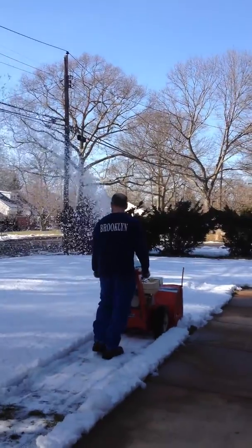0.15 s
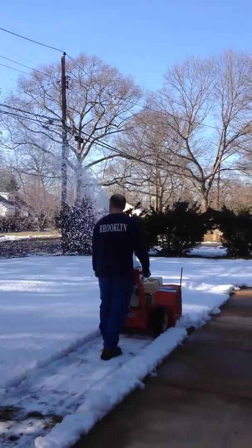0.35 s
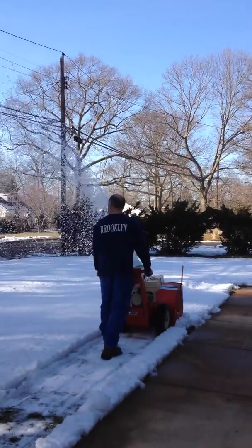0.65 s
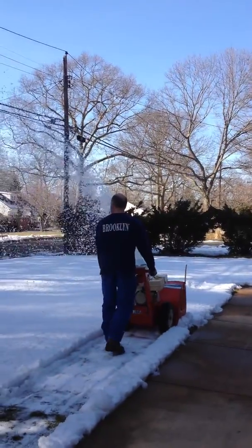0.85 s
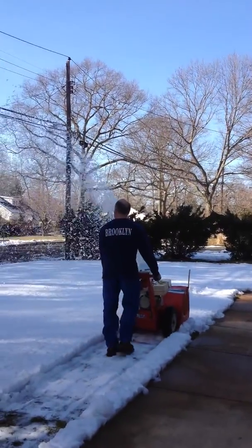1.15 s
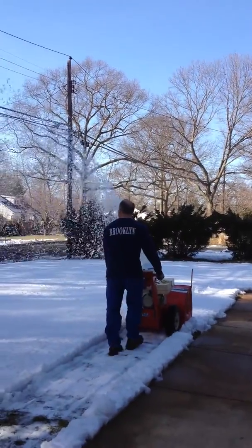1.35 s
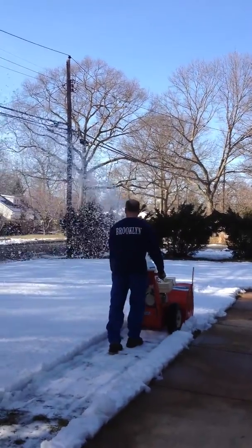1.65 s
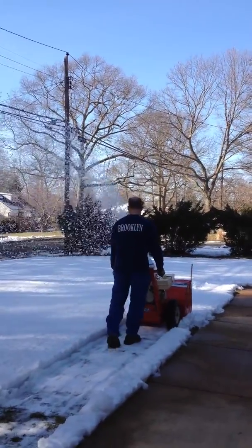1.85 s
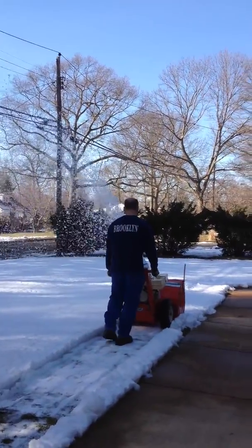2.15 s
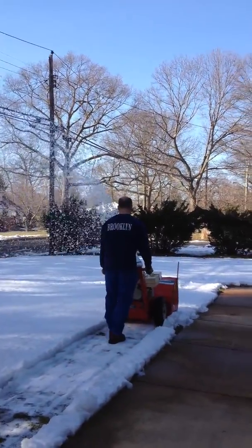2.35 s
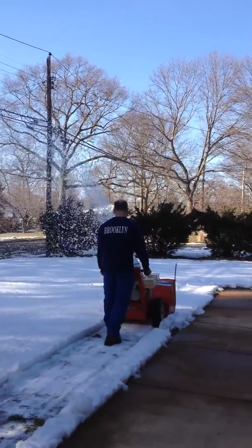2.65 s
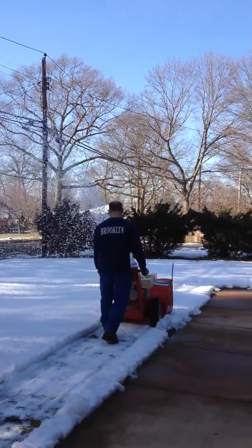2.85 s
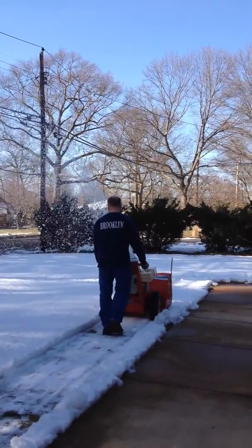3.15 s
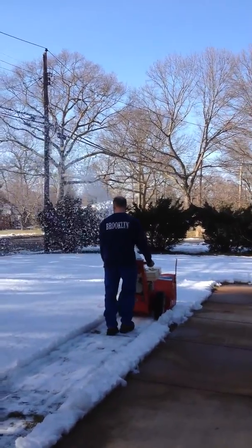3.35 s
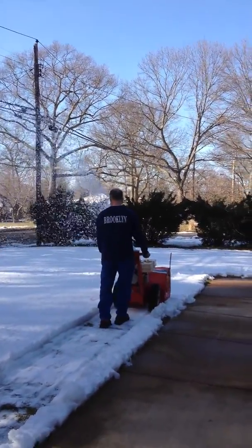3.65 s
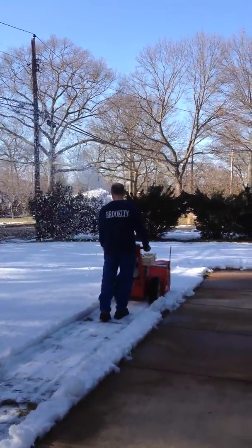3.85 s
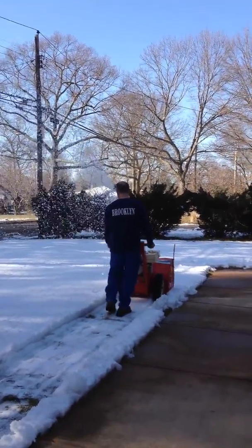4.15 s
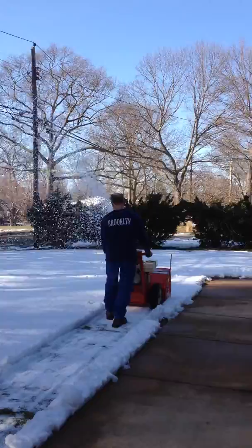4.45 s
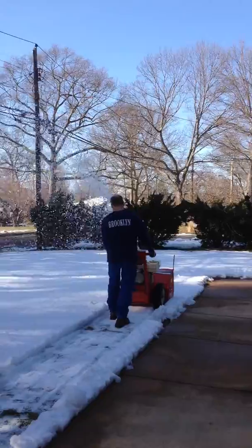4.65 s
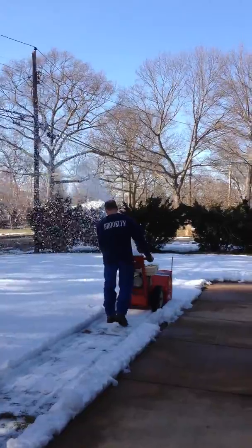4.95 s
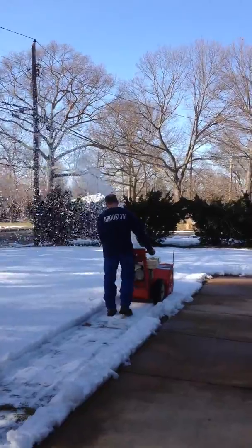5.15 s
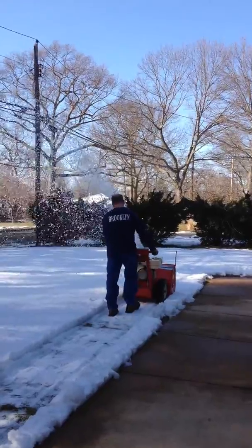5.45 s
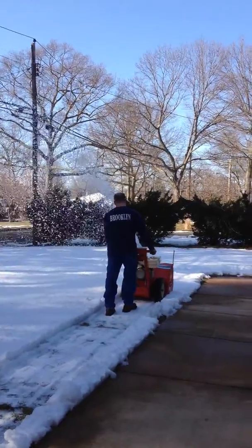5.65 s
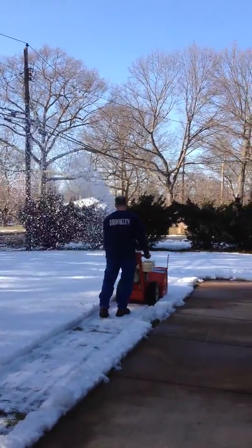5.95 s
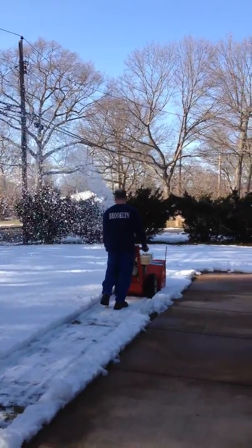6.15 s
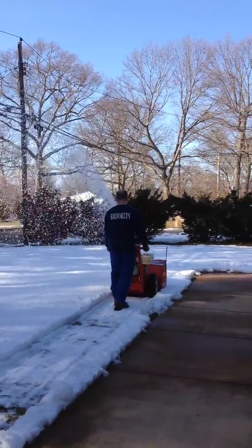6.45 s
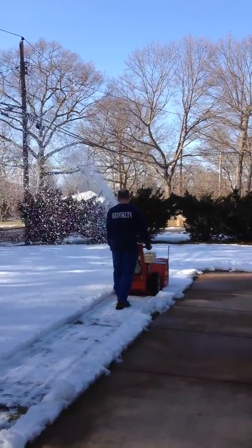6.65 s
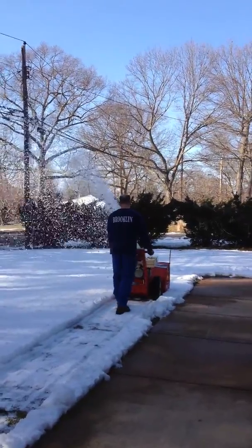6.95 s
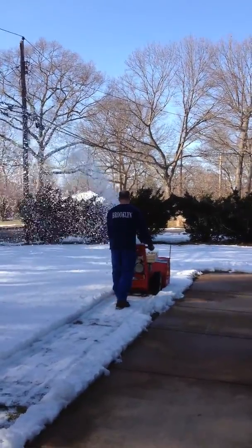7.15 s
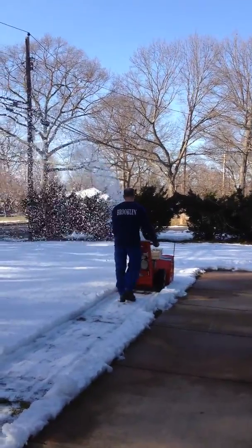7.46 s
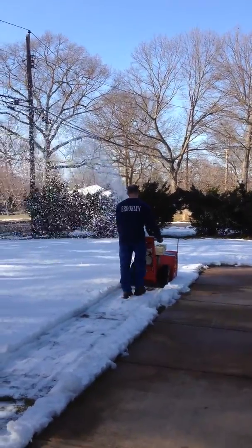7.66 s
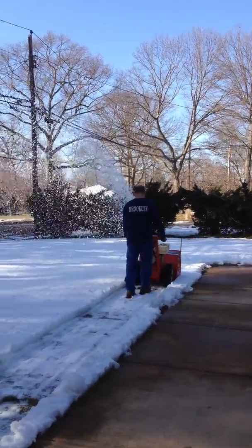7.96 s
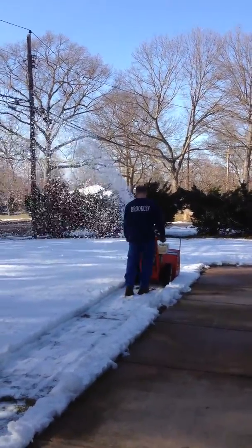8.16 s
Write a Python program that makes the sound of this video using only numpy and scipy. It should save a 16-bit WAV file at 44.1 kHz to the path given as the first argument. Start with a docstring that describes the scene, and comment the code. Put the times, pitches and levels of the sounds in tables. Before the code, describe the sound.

A continuous petrol snowblower, heard from behind in the open air. Rapid exhaust pops blur into a low buzzing hum, valve clatter ticks sharply on top, and the impeller rumbles unevenly. Hissing, tinny snow-and-air noise dominates. Engine speed wavers slightly under load. Over eight seconds the ticks dull and the roar sinks, while the low rumble stays nearly constant.

```python
"""A single-cylinder four-stroke snowblower crosses a snowy lawn, from about 6 m off a small microphone to 12 m.
Throughout, the impeller rumbles and fan air and flying snow roar in the sheet-metal housing: filtered noise.
Over this, every cycle, valve gear knocks as short rings, the intake gulps and the exhaust pops as filtered clicks.
As the machine walks off, rumble, roar and pulses sink by their own shares of the distance law;
the knocks fade by stages, the sharpest tick most."""
import sys
import numpy as np
from scipy import signal
from scipy.fft import rfft, irfft
from scipy.io import wavfile
from scipy.ndimage import uniform_filter1d

SR = 44100
rng = np.random.default_rng(int(sys.argv[2]) if len(sys.argv) > 2 else 0)


def store_pcm(level_fs):
    """Save levels as 16-bit WAV."""
    pcm = np.round(np.clip(level_fs, -1, 1) * 32767).astype(np.int16)
    wavfile.write(sys.argv[1], SR, np.atleast_2d(pcm).T)


N = 366912

START_M, PACE_M_PER_S = 5.83, 0.76  # distance from the microphone at the start, walking pace
# levels at the start, before swells and engine speed act on them
PULSE_DB, RUMBLE_DB, ROAR_DB = -29.5, -34, -25.5
# share of the 1 / distance law that pulses, rumble and roar follow
PULSE_FALL, RUMBLE_FALL, ROAR_FALL = 0.37, 0.06, 0.92


def gain_of(db):
    """Decibels to amplitude."""
    return 10 ** (np.asarray(db) / 20)


def evened(x):
    """Scales to rms 1."""
    return x / np.sqrt(np.mean(x ** 2) + 1e-20)


def read(points, hz):
    """Reads a spectrum table on a log-frequency axis."""
    f, value = np.transpose(points)
    return np.interp(np.log(hz + 1), np.log(f + 1), value)


def coloured(x, points):
    """Passes x through a fixed spectrum."""
    gain = gain_of(read(points, np.fft.rfftfreq(N, 1 / SR)))
    return irfft(rfft(x) * gain, N)


def way_gone():
    """Share of the walk done at every sample, 0-1."""
    return np.arange(N) / N


def staged(values, away):
    """Joins a near, a midway and a far value along the walk."""
    return np.interp(away, (.1, .6, .9), values)


def heard_db(start_db, fall):
    """Level of pulses, rumble or roar as the machine walks off, by a share of the distance law."""
    distance_ratio = 1 + PACE_M_PER_S * np.arange(N) / SR / START_M
    return start_db - fall * 20 * np.log10(distance_ratio)


def speed():
    """Engine cycles per second at every sample."""
    # engine speed hunting under load: (t/s, f/Hz in engine cycles)
    hunting = [(0.0, 25.68), (0.32, 24.66), (1.15, 25.13), (1.33, 25.66), (2.16, 24.79), (2.76, 25.89),
               (3.32, 24.88), (3.78, 25.55), (4.0, 25.14), (4.22, 25.69), (4.95, 24.65), (5.53, 25.56),
               (5.81, 25.14), (6.54, 25.02), (7.24, 25.47), (7.52, 24.92), (8.08, 25.11), (8.32, 24.82)]
    s, hz = np.transpose(hunting)
    return np.interp(np.arange(N) / SR, s, hz)


def cycles():
    """Engine cycles done at every sample, starting part-way through one."""
    return -.129 + np.cumsum(speed()) / SR


def strokes(place, spread_db, jitter_ms):
    """One click a cycle at the given place, uneven in size and time."""
    done = cycles()
    turn = np.arange(-1, int(done[-1]) + 1)
    lateness, size = rng.standard_normal((len(turn), 2)).T
    # turns before the start or past the end land at -N and are dropped
    at = np.interp(turn + place, done, np.arange(N), left=-N, right=-N)
    at = at + lateness * jitter_ms * SR / 1000
    inside = (at >= 0) & (at < N - 1)
    clicks = np.zeros(N)
    clicks[at[inside].astype(int)] = gain_of(spread_db * size[inside])
    return clicks


def rumble():
    """Snow churning in the impeller: low, lumpy noise, louder as the engine speeds up."""
    # impeller colour: (f/Hz, relative level/dB per Hz)
    churn = [(30, -47), (75, -28), (100, -16), (140, -12), (180, 2), (215, -1), (260, -5.5), (310, -3),
             (370, -6), (430, -14), (480, -21.5), (800, -62)]
    usual_hz, db_per_hz = 25.3, 3
    lumps = evened(uniform_filter1d(rng.standard_normal(N), size=3000))
    db = heard_db(RUMBLE_DB, RUMBLE_FALL)
    db += db_per_hz * (speed() - usual_hz)
    db += 1.2 * lumps
    return gain_of(db) * evened(coloured(rng.standard_normal(N), churn))


def throb(band):
    """Power of one band over the cycle: a steady bed plus bursts of clatter and jet hiss."""
    # bursts: (place in the cycle 0-1, rise/ms, decay/ms, peak level over the bed/dB in the four
    # bands around f/Hz 900, 2500, 5500 and 11000, level change by the end of the walk/dB)
    bursts = [(.39, .6, 2.4, -3, 0, -1, 3, -2.5), (.69, .5, 1, 3, -8, -8, -12, -1),
              (.77, .8, 2.2, -3, .5, -1, 1.5, .5), (.02, .8, 1.8, -1, -8, -9, -9, 0)]
    ms = np.arange(1200) / SR * 1000
    power = np.ones(N)
    for place, rise_ms, decay_ms, *dbs, fade_db in bursts:
        shape = (1 - np.exp(-ms / rise_ms)) * np.exp(-ms / decay_ms)
        # triggered a little ahead of the listed place
        hits = strokes(place - .02, spread_db=3, jitter_ms=.25)
        burst_power = gain_of(2 * (dbs[band] + fade_db * way_gone()))  # doubled dB: power
        power += burst_power * signal.oaconvolve(hits, shape / shape.max())[:N]
    return power / uniform_filter1d(power, size=SR // 2)


def roar():
    """Air and snow noise throbbing with the engine, ringing in the panels, changing colour with distance."""
    # edges between the four throbbing bands: (f/Hz)
    band_edges = (1500, 4000, 7800)
    # roar as the microphone colours it, close by: (f/Hz, relative level/dB per Hz)
    near_colour = [(300, -26), (480, -4), (800, 2.5), (1300, -6.5), (1700, -1.5), (2950, -0.5), (3700, 0),
                   (5500, 8.5), (6600, 3), (9000, -7), (10150, -16.5), (10700, -9.5), (12200, -13.5),
                   (15300, -15)]
    # the same farther off: (f/Hz, relative level/dB per Hz)
    far_colour = [(300, -19), (480, -1.5), (800, 1.5), (1300, 2), (1700, -3), (2950, -1.5), (3700, 2.5),
                  (5500, 7.5), (6600, 4.5), (9000, -6), (10150, -15.5), (10700, -12), (12200, -11.5),
                  (15300, -17)]
    # housing panels ringing, turning with the machine: (f/Hz, width/Hz, boost/dB near, midway, far)
    panels = [(660, 40, 3.3, 2.9, 4.1), (830, 40, 3.3, 3.6, 3.4), (910, 40, 3.7, 4.7, 5.3),
              (1020, 60, 5.6, 0.0, 0.0), (1190, 60, 1.1, 5.4, 0.0), (1375, 60, 3.8, 10.4, 8.6),
              (1560, 50, 1.7, 0.0, 3.7), (1990, 120, 2.4, 5.2, 3.3), (2150, 80, 1.7, 4.9, 1.3),
              (2550, 90, 2.5, 0.0, 3.8), (2700, 60, 4.9, 0.0, 3.4), (3150, 70, 1.4, 2.0, 2.3),
              (3380, 120, 3.3, 2.5, 0.8), (3980, 120, 0.8, 1.8, 0.0), (4280, 200, 3.1, 4.1, 0.6),
              (5000, 120, 3.3, 1.6, 4.0), (5220, 200, 1.7, 5.9, 0.0), (5570, 120, 1.1, 0.0, 2.4),
              (5760, 200, 2.4, 0.0, 6.9), (5930, 200, 2.7, 4.3, 1.7), (9400, 250, 1.7, 1.1, 1.1),
              (11300, 700, 1.5, 4.0, 2.0), (12700, 400, 4.0, 3.7, 2.8), (13650, 200, 6.9, 2.8, 2.4)]
    # swelling and sinking with the depth of snow: (t/s, level/dB)
    snow_depth = [(0, 0.45), (.9, 0.4), (2, -.6), (2.8, .3), (4.3, -.5), (5.4, 1), (6.2, -.3), (7.3, 0.5),
                  (8.32, -0.5)]

    band_of = np.searchsorted(band_edges, np.fft.rfftfreq(N, 1 / SR))
    air = rng.standard_normal(N)
    # clots of snow make all bands flutter together
    clots = evened(uniform_filter1d(rng.standard_normal(N), size=1200))
    air *= gain_of(0.61 * clots)
    air = irfft(sum(rfft(air * np.sqrt(throb(k))) * (band_of == k) for k in range(4)), N)

    hz, t, frames = signal.stft(air, SR, nperseg=2048, noverlap=1536)
    hz, away = hz[:, None], t * SR / N
    db = read(near_colour, hz) * (1 - away) + read(far_colour, hz) * away
    for f, width, *boosts in panels:
        db += staged(boosts, away) / (1 + (2 * (hz - f) / width) ** 2)
    # narrow patches drift as the machine sways behind the person pushing it
    patches = rng.standard_normal((len(t), len(hz))).T
    patches = uniform_filter1d(patches, size=5, axis=0)  # over frequency
    patches = uniform_filter1d(patches, size=40, axis=1)  # over time
    db += 1.4 * evened(patches)
    colour = gain_of(db)
    colour = colour / np.sqrt((colour ** 2).mean(axis=0))  # same mean power at every moment
    noise = signal.istft(frames * colour, SR, nperseg=2048, noverlap=1536)[1][:N]

    swell_db = np.interp(np.arange(N) / SR, *np.transpose(snow_depth))
    return gain_of(heard_db(ROAR_DB, ROAR_FALL) + swell_db) * noise


def knocks():
    """Valve gear striking head and block: short rings of solid metal, screened off as the machine leaves."""
    # one knock a cycle each: (place in the cycle 0-1, f/Hz, t60/s, rise/ms,
    # level/dB near, midway, far, before rise and decay shape the ring)
    valve_gear = [(.4, 5600, .012, .2, -16, -24, -28), (.67, 870, .016, 1, -27, -33, -35),
                  (.005, 640, .025, 1, -32, -35, -36), (.365, 910, .018, 1, -31, -37, -40)]
    t, out = np.arange(2000) / SR, np.zeros(N)
    for place, hz, t60, rise_ms, *dbs in valve_gear:
        ring = gain_of(-60 * t / t60) * np.sin(2 * np.pi * hz * t)
        ring *= 1 - np.exp(-1000 * t / rise_ms)
        hits = strokes(place, spread_db=2, jitter_ms=.06) * gain_of(staged(dbs, way_gone()))
        out += signal.oaconvolve(hits, ring)[:N]
    return out


def pulses():
    """Exhaust pushes, intake sucks about 0.3 of a cycle later: their gap carves the pattern of the hum."""
    # pressure pulses: (place in the cycle 0-1, sign, relative level/dB near, far)
    pressure = [(.791, 1, 0, 0), (.086, -1, -.8, -1.1), (.41, 1, -16, -11)]
    # colour through muffler and air box, close by: (f/Hz, relative level/dB)
    near_pipe = [(60, -56), (80, -34), (100, -6), (125, -5), (150, 2.5), (210, -1.5), (290, -1), (360, -14),
                 (460, -48), (560, -30), (700, -26), (1100, -52)]
    # the same farther off: (f/Hz, relative level/dB)
    far_pipe = [(60, -52), (80, -32), (100, -3), (125, 1.1), (150, -3.5), (210, -0.5), (290, -8),
                (360, -10.5), (460, -29.5), (560, -32), (700, -28), (1100, -50)]
    away, train = way_gone(), np.zeros(N)
    for place, sign, near_db, far_db in pressure:
        gain = gain_of(near_db + (far_db - near_db) * away)
        train += sign * gain * strokes(place, spread_db=1.1, jitter_ms=0.033)
    near, far = evened(coloured(train, near_pipe)), evened(coloured(train, far_pipe))
    return gain_of(heard_db(PULSE_DB, PULSE_FALL)) * ((1 - away) * near + away * far)


def scene():
    """Impeller, housing and engine together."""
    return (rumble() + roar() + knocks() + pulses())[None]


def record(dry):
    """The band limit of the recorder: a steep low-pass."""
    edge_hz = 15260
    lowpass = signal.firwin(1023, edge_hz, window=("kaiser", 9), fs=SR)
    return signal.oaconvolve(dry, lowpass[None], "same")


dry = scene()
out = record(dry)
store_pcm(out)
```